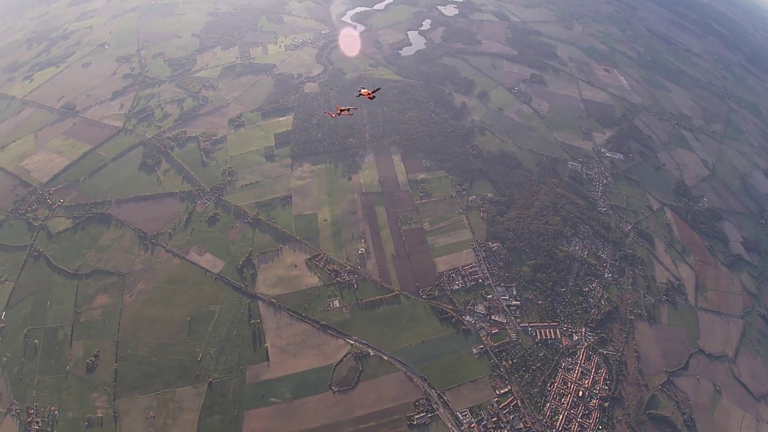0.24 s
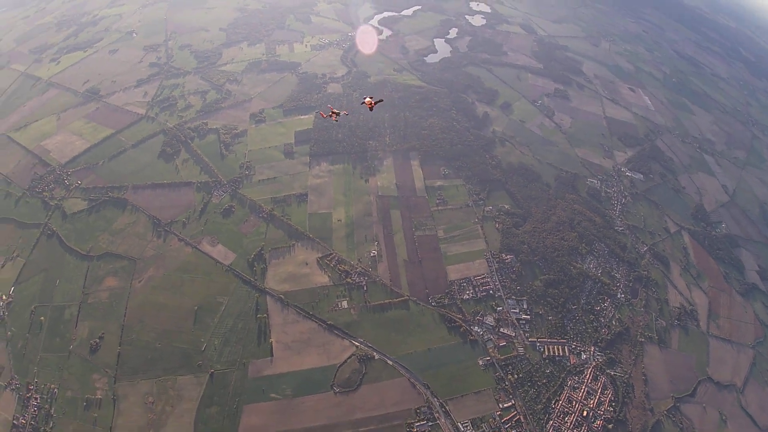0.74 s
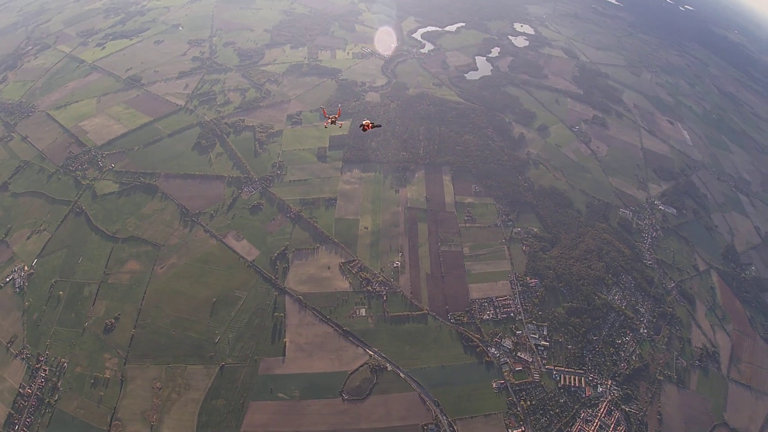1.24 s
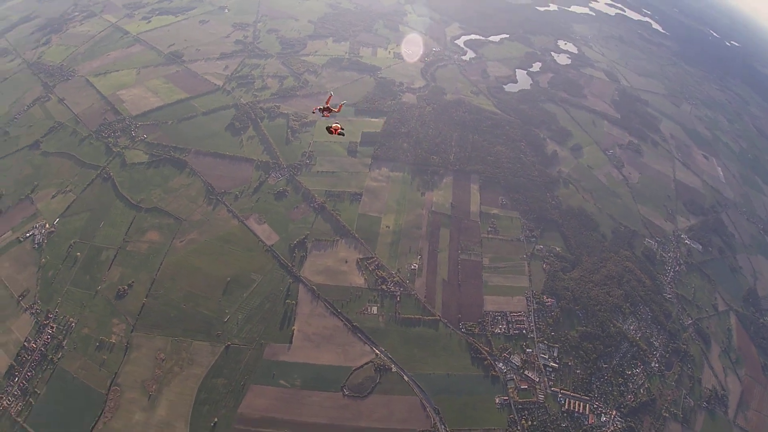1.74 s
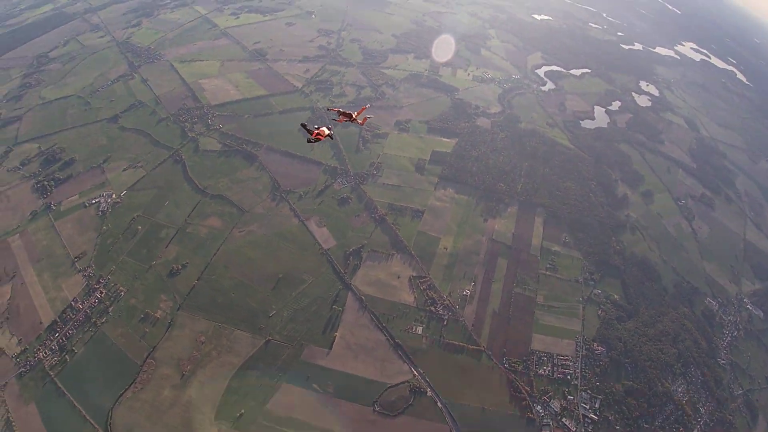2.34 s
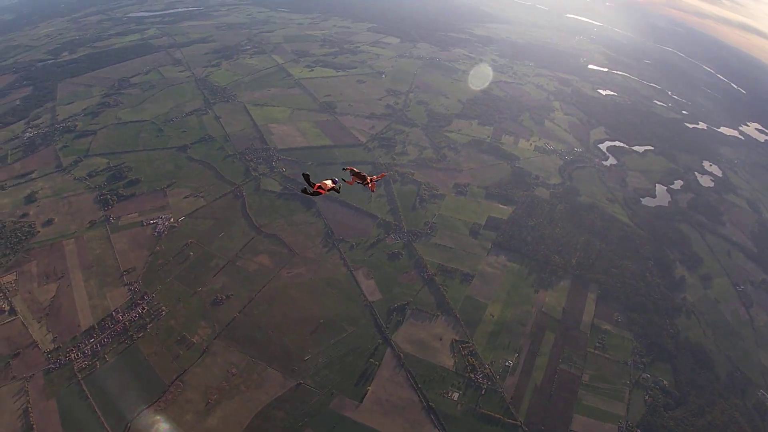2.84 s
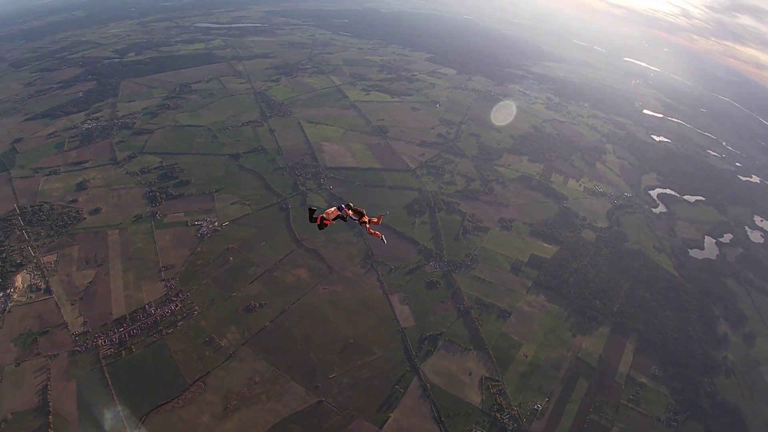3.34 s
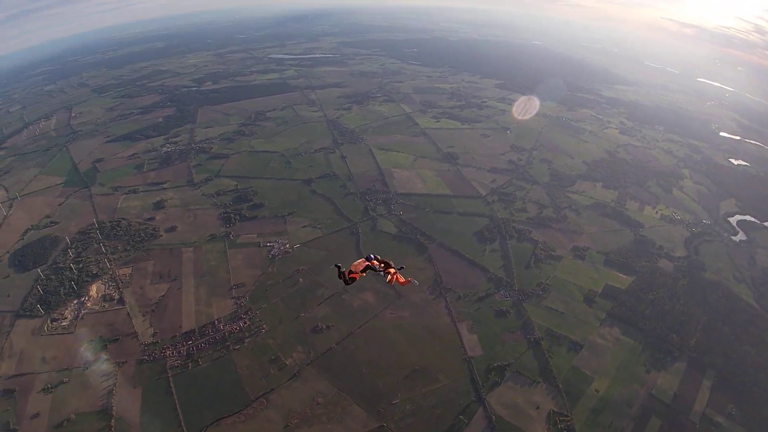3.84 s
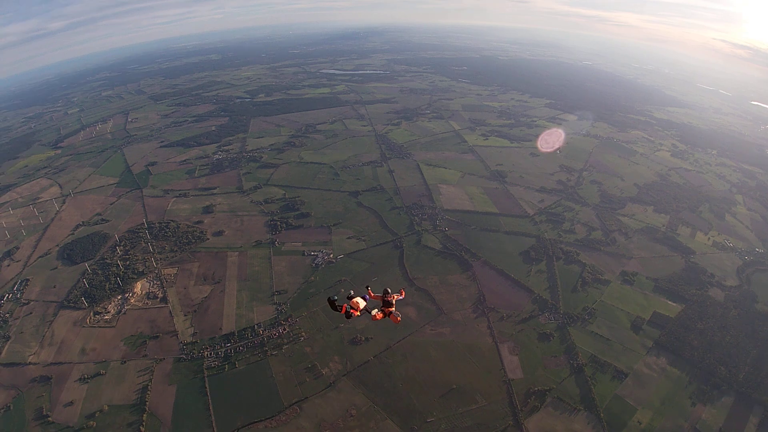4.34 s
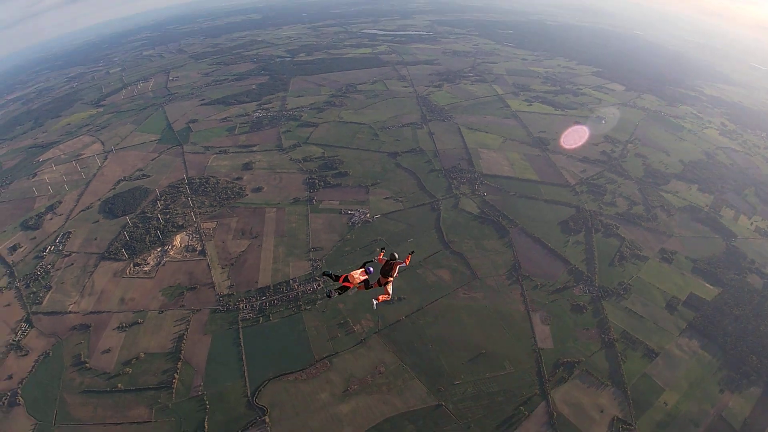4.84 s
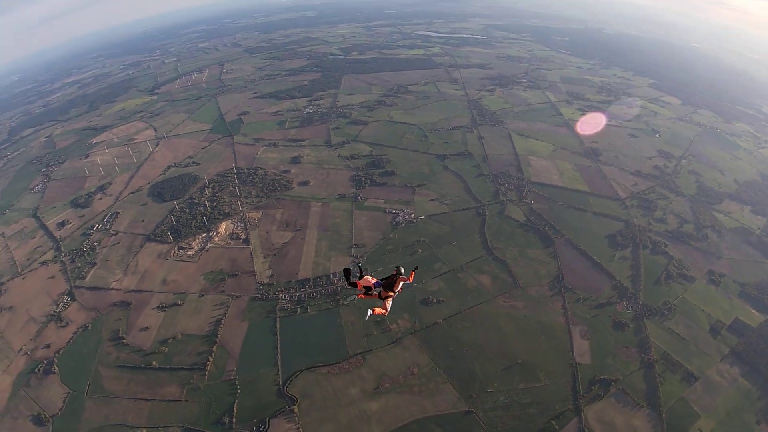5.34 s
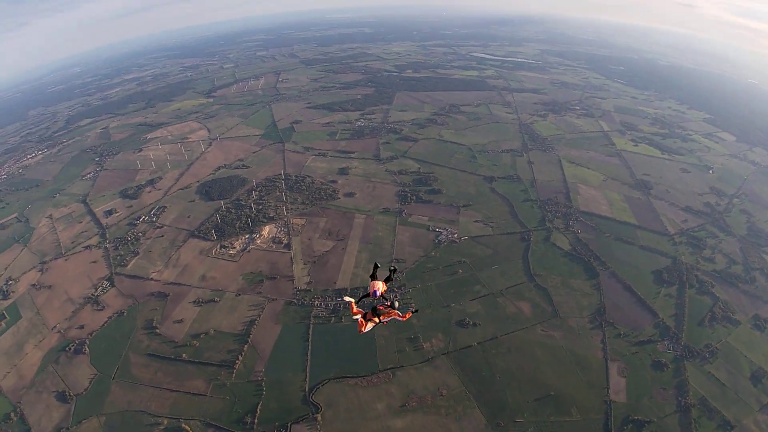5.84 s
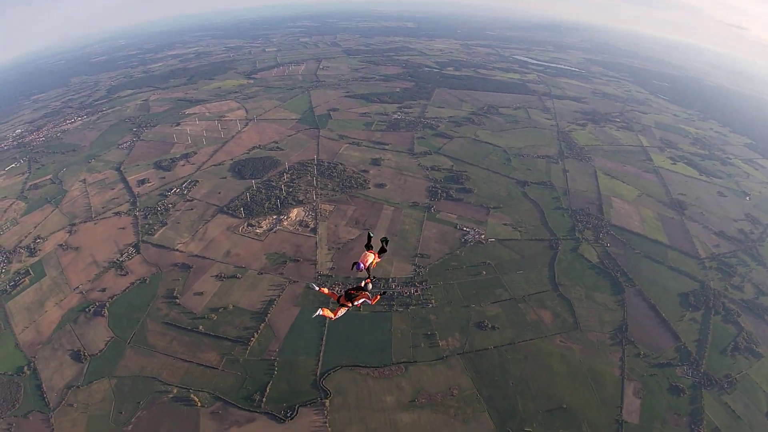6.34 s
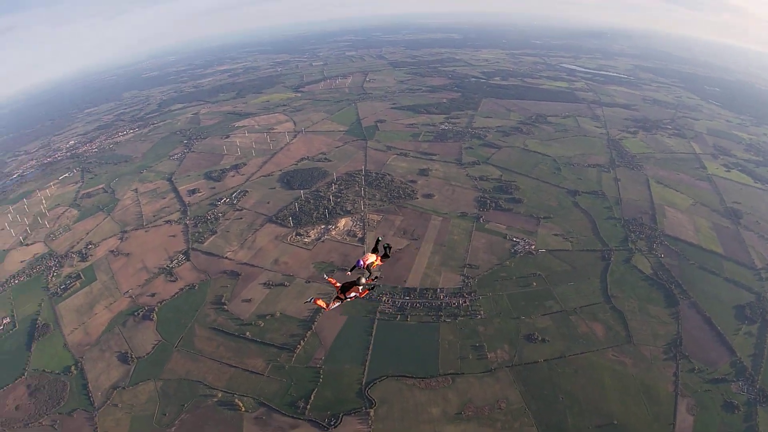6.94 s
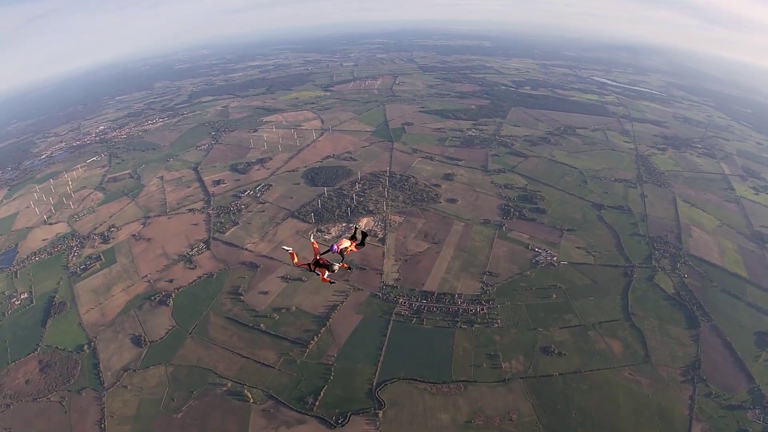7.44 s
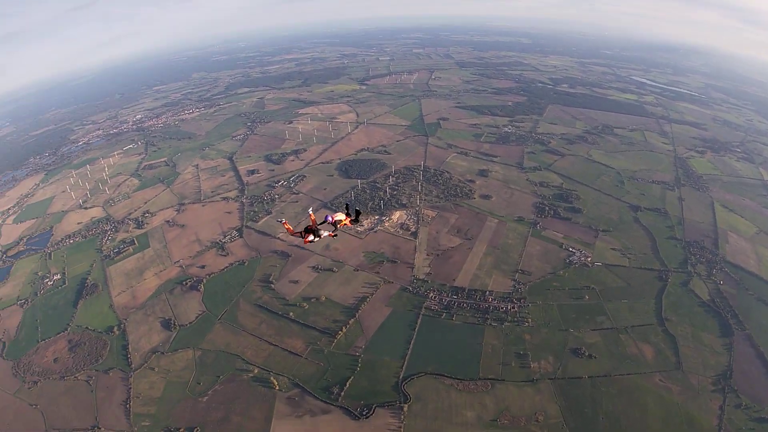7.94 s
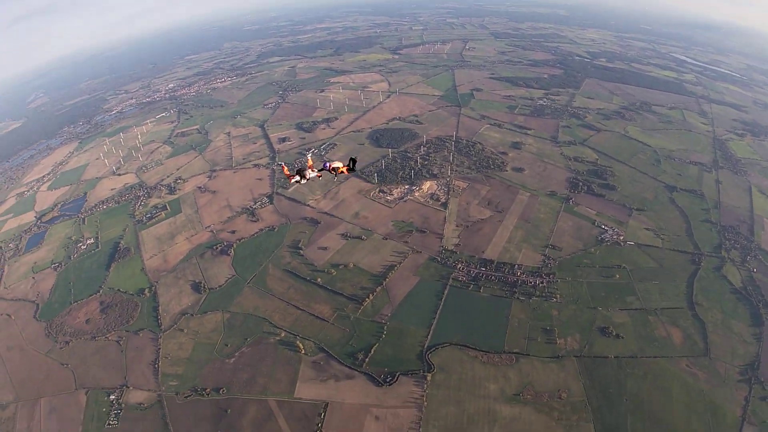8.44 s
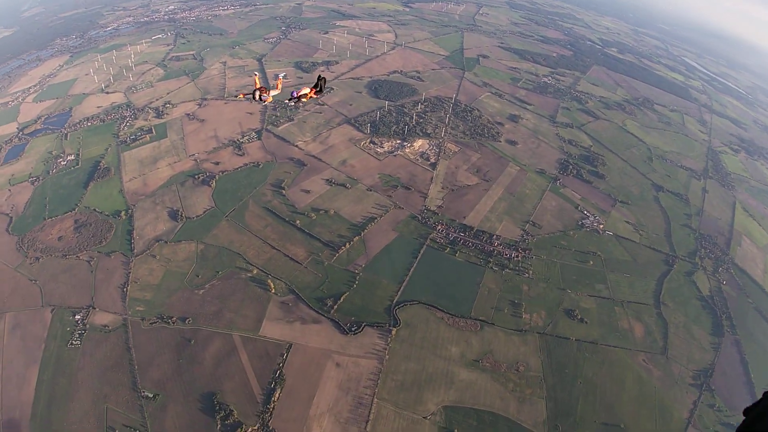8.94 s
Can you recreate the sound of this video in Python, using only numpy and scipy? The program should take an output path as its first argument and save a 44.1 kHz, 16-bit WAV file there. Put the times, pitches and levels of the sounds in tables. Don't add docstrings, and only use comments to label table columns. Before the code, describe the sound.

A loud freefall wind roar fills the whole nine seconds, close and dry, with no echo. Underneath is deep shaking rumble and a hollow boom from the camera's closed housing; above it, rough gusts crackle over the microphone and a thin hiss flutters. From 0 to 2 s it is dense and steady, with a hard slap near 0.4 s. Between 2 and 3 s slaps crowd together, the sharpest about 2.7 s, and the hiss brightens around 3 s. Near 4.1 s the rough midrange dips, partly recovers, then thins from 5.1 to 6 s, leaving mostly boom. At 6.1-6.4 s gusts slam back, drop near 6.8 s, and return with quick slaps at 7 s and thick buffeting to 7.7 s. Another lull comes near 8 s, then gusts build from 8.5 s, the boom slightly higher, until an abrupt end just after 9 s.

```python
import sys
import numpy as np
from scipy import signal
from scipy.fft import rfft, irfft, next_fast_len
from scipy.io import wavfile
from scipy.ndimage import uniform_filter1d

SR = 44100
rng = np.random.default_rng(int(sys.argv[2]) if len(sys.argv) > 2 else 0)


def transcribe(u):
    v = np.clip(np.atleast_2d(u).T, -1, 1)
    q = np.round(v * 32767).astype(np.int16)
    wavfile.write(sys.argv[1], SR, q)


def gain_from_db(level_db):
    decades = np.asarray(level_db, float) / 20
    return 10 ** decades


N = 405277
TIME_S = np.arange(N) / SR

# frequency in Hz, density in dB per Hz.
BUFFET_SPECTRUM = [(10, -13.5), (25, 6.5), (60, 15), (90, 10), (130, 10), (250, -47)]
# frequency in Hz, density in dB per Hz.
CAVITY_SPECTRUM = [(30, -43.5), (75, -15), (108, -2.5), (140, -3.5), (195, -6.5), (270, -15.5),
                   (450, -38.5), (900, -83)]
# frequency in Hz, density in dB per Hz.
LARGE_SPECTRUM = [(90, -58), (170, -0.5), (240, 0), (320, -1.5), (450, -8), (650, -19), (1200, -77.5)]
# frequency in Hz, density in dB per Hz.
SMALL_SPECTRUM = [(200, -45), (400, 0.5), (600, 0.5), (850, -3.5), (1150, -6.5), (1600, -12.5),
                  (2600, -35.5)]
# frequency in Hz, density in dB per Hz.
FINE_SPECTRUM = [(500, -29), (950, -11.5), (1350, -3.5), (1900, -5.5), (2600, -14.5), (3800, -18),
                 (6000, -49)]
# frequency in Hz, density in dB per Hz.
SHEET_SPECTRUM = [(900, -34), (1700, -11), (2500, -1), (3200, -2.5), (4000, -6.5), (5000, -12),
                  (6500, -23.5), (8000, -39.5)]
# frequency in Hz, density in dB per Hz.
TOP_SPECTRUM = [(3000, -30.5), (5000, 3), (6500, -4), (8000, -9.5), (10000, -19), (11500, -24),
                (13000, -29)]

# time in seconds, tilt 0-1, boom centre in Hz.
TILT = [(0, 0, 143), (1.2, 0.13, 136.3), (2.3, 0.16, 139.3), (3.0, 0.5, 146.2), (3.5, 0.3, 144.3),
        (4.2, .8, 151.7), (4.9, 0.7, 158), (5.4, .6, 145.3), (6.0, 0.8, 161.3), (7.3, 0.95, 155),
        (8.1, 0.8, 152.7), (8.6, 0.9, 167), (9.19, 0.6, 180)]
# time in seconds, exposure in dB.
EXPOSURE = [(2.4, 0.5), (2.7, 2), (3.5, 1.5), (4.12, -7), (4.7, -2), (4.95, -2.5), (5.15, -7),
            (6.04, -10.5), (6.11, -0.5), (6.45, -3.5), (6.8, -12), (7.1, -4), (7.2, 5), (7.75, 0.5),
            (7.95, -8.5), (8.26, -5), (8.6, 0), (9.19, 2.5)]
# time in seconds, speed in dB.
SLIDE = [(0, -1.5), (1.3, 0), (1.55, -3.5), (1.8, -2), (2.3, 0.5), (3.0, 3), (3.75, 2.5), (3.95, 0.5),
         (4.9, 1), (5.2, 0), (5.45, -1), (6.5, 0), (7.2, -4), (7.75, -3.5), (7.9, -0.5), (8.25, 0.5),
         (8.42, 1), (9.19, 2)]
# centre in seconds, length
# in seconds, strength in dB, eddy pitch in Hz.
GUSTS = [(0.423, 0.04, 5, 300), (1.314, 0.12, 2, 6500), (1.4, 0.14, -1, 59.4), (2.35, 0.34, 3.5, 60.3),
         (3.183, 0.15, -5.5, 1480), (3.65, 0.16, 1, 2980), (3.877, .1, -5, 5000), (4.506, .1, 2, 5000),
         (4.795, 0.16, 1, 60), (5.173, 0.39, -9, 5000), (5.508, 0.32, 0, 149), (6.15, 0.11, -8, 6500),
         (6.23, 0.1, 5.5, 307), (6.3, 0.087, 1, 1200), (6.42, 0.13, 4.5, 1010), (6.644, 0.079, 2, 2800),
         (6.884, 0.19, -2.5, 2470), (6.953, 0.13, -2.5, 700), (7.0, .08, 0, 6500), (7.27, 0.18, -12, 6430),
         (7.402, 0.091, 1, 600), (7.57, 0.054, 6.5, 5000), (7.723, 0.086, -6.5, 149),
         (8.113, 0.088, 0, 700), (8.224, 0.063, -4, 300), (8.463, 0.17, 4.5, 2190), (8.62, .1, -4, 6440),
         (8.704, 0.16, 3.5, 300), (8.89, 0.065, -1, 500), (9.0, 0.3, 1.5, 596),
         (.12, .2, 0, 300), (.55, 0.23, 2, 2000), (2.84, 0.29, -3, 298), (3.159, .08, -1, 6500),
            (3.364, 0.3, -3.5, 300), (3.578, 0.18, -3, 300), (4.1, 0.097, -1.5, 600), (4.284, 0.82, 2, 150),
            (4.45, 0.12, -5, 6500), (5.652, 0.052, -5, 1490), (5.896, .35, 2, 6500), (5.9, 0.42, 4, 297),
            (6.092, 0.032, 3, 700), (6.58, 0.053, -6, 6500), (6.67, .07, -4, 600), (6.74, .05, 3.5, 646),
            (6.83, 0.078, 5, 6500), (6.828, 0.21, -5, 1500), (6.896, .06, 11, 500), (7.07, 0.087, 1, 5000),
            (7.306, 0.36, -4.5, 300), (7.55, 0.096, -1, 696), (7.775, .1, -6, 6500),
            (8.142, 0.037, -9, 1500), (8.244, 0.082, -6.5, 1500), (8.29, .08, 3, 5000), (8.53, .1, 3, 6500),
            (8.936, .1, 3, 6500), (9.081, .08, 2.5, 5000), (9.156, 0.067, -2, 1480)]
# peak in seconds, snap level in dB, duller push relative to the snap in dB.
SLAPS = [(0.282, -28, -3), (0.425, -9, -14), (0.611, -14, -14), (1.215, -18, -1), (1.88, -12, -8),
         (1.908, -19, -8), (2.019, -19, -9), (2.145, -12, 1), (2.382, -14, -3), (2.448, -22, -1),
         (2.579, -17, -5), (2.742, -5, -22), (2.864, -23, -1), (2.897, -10, -8), (3.087, -12, 3),
         (3.461, -26, -5), (6.095, -22, 2), (6.229, -9, -1), (6.398, -10, -11), (6.955, -9.5, -2),
         (6.992, -9, -3), (7.193, -14, 0), (7.513, -18, 1), (7.633, -15, 10), (7.736, -17, 2),
         (8.575, -13, -4), (8.6, -16, 2), (8.628, -17, 4), (9.033, -26, 0), (9.079, -16, -4)]
# peak in seconds, level in dB, pitch in Hz.
TICKS = [(0.4249, -31, 3570), (0.4798, -27, 4030), (0.5077, -31, 3810), (0.5521, -31, 3360),
         (0.5716, -31, 3710), (0.6115, -30, 3730), (0.8694, -27, 3810), (1.1109, -30, 3700),
         (1.6087, -28, 3690), (2.0208, -31, 4110), (2.2363, -26, 3710), (2.38, -32, 3470),
         (2.5411, -30, 3730), (3.035, -31, 3780), (3.3218, -30, 3350), (3.4136, -32, 3670),
         (4.0084, -29, 3440), (4.1789, -33, 3360), (4.5989, -32, 4240), (5.887, -32, 3380),
         (6.6228, -29, 3520), (6.9915, -38, 3570), (7.8111, -33, 3400), (8.0257, -32, 3300),
         (8.8977, -34, 3630), (9.0997, -28, 3850)]

# level in dB, eddy pitch in Hz, change at full tilt in dB,
# share of exposure (dB per dB), share of slide (dB per dB).
SHAKING = (-19, 53, -4, 0.06, 0)
# dB, Hz, dB, dB per dB, dB per dB.
BOOMING = (-16, 149, 1.5, 0.04, -0.24)
# dB, Hz, dB, dB per dB, dB per dB.
LARGE_EDDIES = (-20, 305, 0.5, 0.83, -0.45)
# dB, Hz, dB, dB per dB, dB per dB.
SMALL_EDDIES = (-28.5, 650.5, 0.1, 0.95, 0.64)
# dB, Hz, dB, dB per dB, dB per dB.
FINE_EDDIES = (-37.5, 1500, 3.5, 0.39, 0.7)
# dB, Hz, dB, dB per dB, dB per dB.
SHEET_HISS = (-40.5, 3001.5, -0.2, -0.06, 0.83)
# dB, Hz, dB, dB per dB, dB per dB.
TOP_HISS = (-53, 6499, -8.5, 0.03, 0.77)

GUST_REACH_OCTAVES = 1
PUFF_DB, PUFF_S = 3.5, 0.0061
CEILING = 1.1


def evened(x):
    return x / np.sqrt(np.mean(x ** 2) + 1e-20)


def curves(rows, at_s=TIME_S):
    time_s, *columns = np.transpose(rows)
    return [np.interp(at_s, time_s, column) for column in columns]


def drift(rate_hz):
    size = next_fast_len(N, True)
    hz = np.fft.rfftfreq(size, 1 / SR)
    weight = hz / (hz + 0.5) / (1 + (hz / rate_hz) ** 2)
    spectrum = rfft(rng.standard_normal(N), size) * weight
    return evened(irfft(spectrum, size)[:N])


def turbulence(colour, size, patchy_db, stretch=np.ones(N)):
    hop = size // 4
    hz = np.fft.rfftfreq(size, 1 / SR)
    frames = N // hop + 5
    real, imag, patches = rng.standard_normal((frames, len(hz), 3)).T
    patches = uniform_filter1d(patches, size=7, axis=0)
    patches = evened(uniform_filter1d(patches, size=14, axis=1))
    frame_start = np.minimum(np.arange(frames) * hop, N - 1)
    slid_hz = hz[:, None] / stretch[frame_start]
    point_hz, point_db = np.transpose(colour)
    colour_db = np.interp(np.log(slid_hz + 1), np.log(point_hz + 1), point_db)
    colour_db = colour_db - 30 * np.log2(np.maximum(slid_hz / point_hz[-1], 1))
    spectrum = (real + 1j * imag) * gain_from_db(colour_db + patchy_db * patches)
    return evened(signal.istft(spectrum, nperseg=size, noverlap=size - hop)[1][:N])


def bursts(slow, fast, slow_db, fast_db):
    return evened(gain_from_db(slow_db * slow + fast_db * fast))


def wavelet(hz, turns, phase):
    t = np.arange(-110, 111) / SR
    return np.exp(-(t * hz / turns) ** 2) * np.cos(2 * np.pi * hz * t + phase)


def crackle(low_hz, high_hz, per_s, spread_db):
    size = gain_from_db(spread_db * np.minimum(rng.exponential(1, N), 4))
    size = size * (rng.random(N) < per_s / SR)
    kind = rng.integers(0, 8, N)
    phases = 2 * np.pi * rng.random(8)
    out = np.zeros(N)
    for k, hz in enumerate(np.geomspace(low_hz, high_hz, num=8)):
        blip = low_hz / hz * wavelet(hz, 0.5, phases[k])
        out += signal.oaconvolve(size * (kind == k), blip, "same")
    return evened(out)


def add_blip(out, start_s, blip):
    part = out[max(round(start_s * SR), 0):][:len(blip)]
    part += blip[:len(part)]


def strength(layer):
    level_db, pitch_hz, tilt_db, exposed, sliding = layer
    t = TIME_S[::200]
    tilt = curves(TILT, t)[0]
    exposure_db, slide_db = curves(EXPOSURE, t)[0], curves(SLIDE, t)[0]
    centre_s, length_s, gust_db, gust_hz = np.transpose(GUSTS)[:, :, None]
    reach = np.exp(-(np.log2(pitch_hz / gust_hz) / GUST_REACH_OCTAVES) ** 2)
    envelope = np.exp(-(2 * (t - centre_s) / length_s) ** 2)
    gusts_db = (gust_db * reach * envelope).sum(axis=0)
    flow_db = tilt_db * tilt + exposed * exposure_db + sliding * slide_db
    return np.interp(TIME_S, t, gain_from_db(level_db + flow_db + gusts_db))


def ticks():
    out = np.zeros(N)
    for (peak_s, tick_db, tick_hz), phase in zip(TICKS, rng.random(len(TICKS))):
        blip = gain_from_db(tick_db - 0.5) * wavelet(tick_hz, 0.8, 2 * np.pi * phase)
        add_blip(out, peak_s - 0.0022, blip)
    return out


def hiss(slow, fast):
    flutter, tilt = drift(rate_hz=16), curves(TILT)[0]
    sheet = turbulence(SHEET_SPECTRUM, size=512, patchy_db=-0.4) * bursts(slow, fast, 0.22, 1.7)
    sheet = sheet * gain_from_db((-0.4 + 0.82 * tilt) * flutter)
    sheet = sheet + gain_from_db(-11.5) * crackle(2600, 4600, per_s=300, spread_db=3.0)
    top = turbulence(TOP_SPECTRUM, size=512, patchy_db=-0.5) * bursts(slow, fast, 0.4, 1.0)
    top = top * gain_from_db((0.4 + 1.3 * tilt) * flutter)
    return strength(SHEET_HISS) * evened(sheet) + strength(TOP_HISS) * evened(top)


def slaps():
    out = np.zeros(N)
    for (peak_s, snap_db, push_db), (pitch, turn) in zip(SLAPS, rng.random((len(SLAPS), 2))):
        phase = 2 * np.pi * turn
        snap = wavelet(1300 + 700 * pitch, 0.39, phase)
        push = gain_from_db(push_db + 1) * wavelet(720, 0.5, phase)
        add_blip(out, peak_s - 0.0019, gain_from_db(snap_db - 5) * (snap + push))
    return out


def puffs():
    t = TIME_S[::50]
    peak_s = np.transpose(SLAPS)[0][:, None]
    lift = np.exp(-((t - peak_s) / PUFF_S) ** 2).sum(axis=0)
    return np.interp(TIME_S, t, gain_from_db(PUFF_DB * np.minimum(lift, 1)))


def port(slow, fast):
    large = turbulence(LARGE_SPECTRUM, size=2048, patchy_db=0.76) * bursts(slow, fast, 0.87, 0.9)
    small = turbulence(SMALL_SPECTRUM, size=1024, patchy_db=0.54)
    small = small + gain_from_db(-4.5) * crackle(560, 1000, per_s=370, spread_db=4.5)
    small = strength(SMALL_EDDIES) * evened(small * bursts(slow, fast, 0.9, 1.3))
    fine = turbulence(FINE_SPECTRUM, size=512, patchy_db=0.6)
    fine = fine + gain_from_db(-2.5) * crackle(1300, 2600, per_s=700, spread_db=5.0)
    fine = strength(FINE_EDDIES) * evened(fine * bursts(slow, fast, 0.45, 0.94))
    return strength(LARGE_EDDIES) * large + puffs() * (small + fine)


def case():
    shaking = turbulence(BUFFET_SPECTRUM, size=4096, patchy_db=0.3)
    stretch = (curves(TILT)[1] / 150) ** 1.44
    boom = turbulence(CAVITY_SPECTRUM, size=4096, patchy_db=0.2, stretch=stretch)
    return strength(SHAKING) * shaking + strength(BOOMING) * boom


def scene():
    slow, fast = drift(rate_hz=24), drift(rate_hz=230)
    return (ticks() + hiss(slow, fast) + slaps() + port(slow, fast) + case())[None]


def roll_off(x):
    return signal.sosfilt(signal.butter(12, 12610, fs=SR, output="sos"), x)


def record(dry):
    power_db = 10 * np.log10(uniform_filter1d(dry ** 2, size=900, axis=1) + 1e-6)
    over_db = uniform_filter1d(np.maximum(power_db + 14.0, 0), size=900, axis=1)
    held = dry * gain_from_db(1.07 - 0.17 * over_db)
    held = held * np.minimum((N - np.arange(N)) / 300 + 0.12, 1)
    return roll_off(CEILING * np.tanh(held / CEILING))


dry = scene()
out = record(dry)
transcribe(out)
```